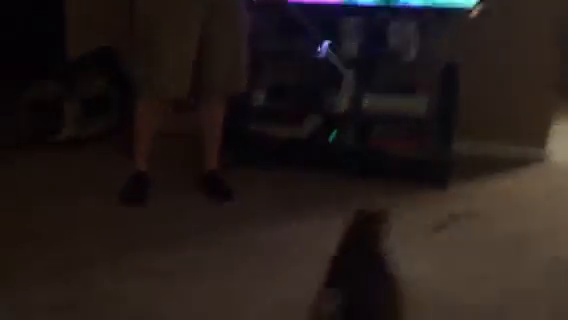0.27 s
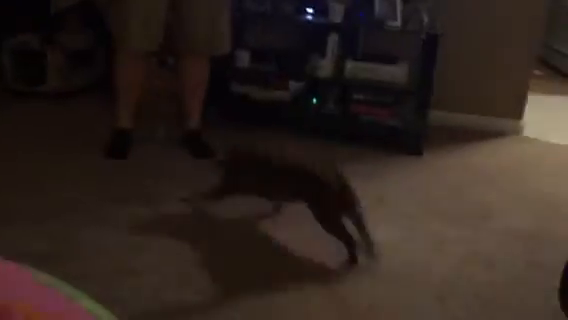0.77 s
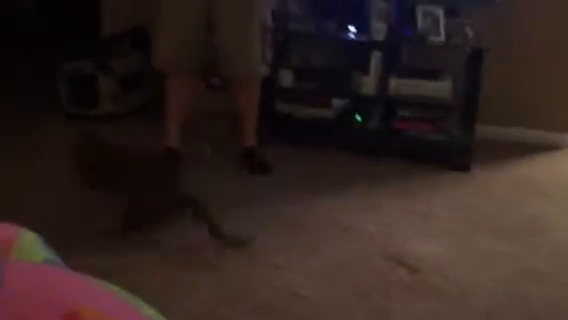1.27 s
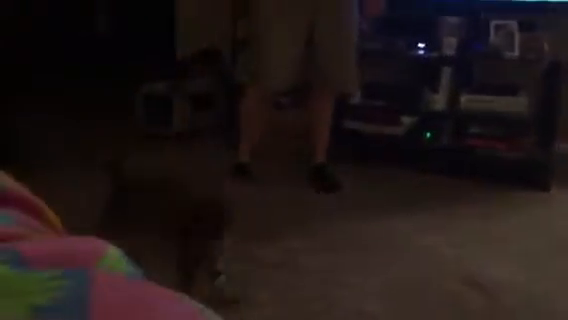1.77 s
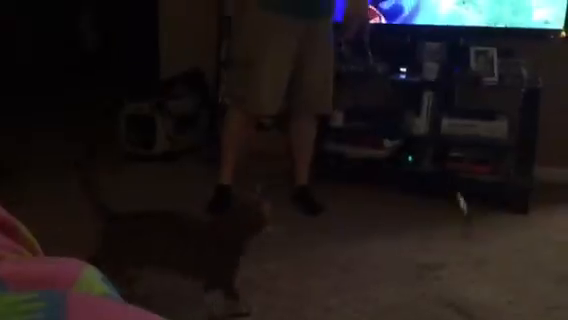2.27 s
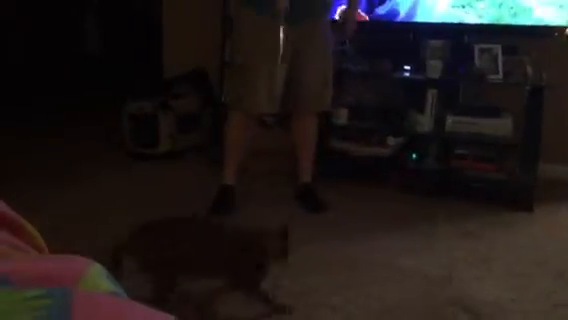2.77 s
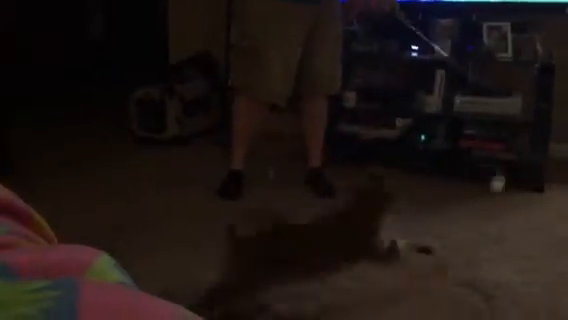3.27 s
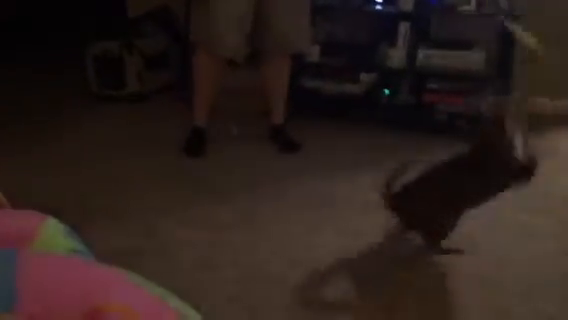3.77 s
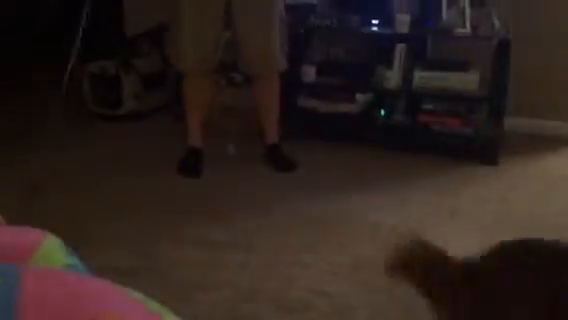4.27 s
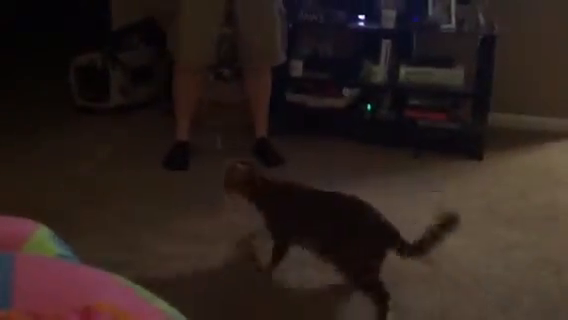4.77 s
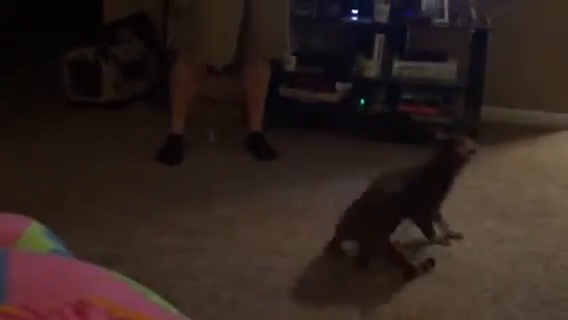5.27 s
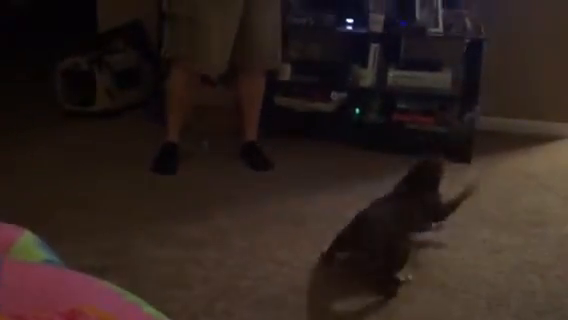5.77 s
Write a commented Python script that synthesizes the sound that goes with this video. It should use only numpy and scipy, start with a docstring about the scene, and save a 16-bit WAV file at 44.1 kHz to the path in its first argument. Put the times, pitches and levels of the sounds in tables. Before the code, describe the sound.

Close, hollow crackling, then soft irregular paw thumps, claw scuffs and the slaps of a feather toy on carpet in a quiet room.

```python
"""Cat chasing a feather toy.

Paws thud into a carpeted wooden floor in a quiet living room and leave the boards rumbling.
The toy slaps down and rustles, claws scuff the pile. At first something stiff and hollow crackles
close by. Faint thin creaks and a squeak follow; later the wand's string whistles twice.
Low hum and microphone hiss lie under it all."""
import sys
import numpy as np
from scipy import signal
from scipy.fft import rfft, irfft, next_fast_len
from scipy.io import wavfile
from scipy.ndimage import map_coordinates

SR = 44100
rng = np.random.default_rng(int(sys.argv[2]) if len(sys.argv) > 2 else 0)


def materialize(psi):
    """Save the field psi as 16-bit PCM at rate SR to the path in sys.argv[1].

    A 1-D psi becomes a single channel; in a 2-D psi each row is a channel.
    """
    bounded = np.clip(np.atleast_2d(psi).T, -1, 1)
    quanta = np.round(bounded * 32767).astype(np.int16)
    wavfile.write(sys.argv[1], SR, quanta)


N = 265482

# paw landings (time [s], level [dB], hardness as mode tilt [dB/octave], joist sag on lowest mode [dB])
LANDINGS = [(0.274, -59, 2, -15), (0.449, -61, -4, -14), (0.779, -59, 6.5, -26), (0.889, -55, 4.5, -23),
            (0.989, -51.5, -2, -15), (1.121, -46, 2.5, -24), (1.307, -40.5, 1.5, -22),
            (1.439, -71, 0.5, -0.5), (1.864, -43, 3.5, -11), (2.359, -54.5, 0, -24), (2.904, -62, 2, -15),
            (2.989, -57, 2, -10), (3.037, -50, -2.5, -17.5), (3.139, -55, -3, -15),
            (3.469, -48.5, -2.5, -14.5), (3.705, -50.5, -0.5, -10.5), (3.774, -45.5, 4.9, -19),
            (3.799, -45.5, 0.5, -19), (4.163, -54, -1, -25), (4.231, -49.5, 6, -14), (4.579, -58, 2.5, -10),
            (4.639, -52.5, 0.5, -28), (4.911, -50.5, -4, -25.5), (5.292, -57.5, -1.3, -9.5),
            (5.339, -62, 0, -5.5), (5.735, -61.5, 4, -8)]
# floorboard modes (frequency [Hz], level [dB])
BOARD_MODES = [(40, 15.5), (76, 4), (120, 3), (163, -3.5), (205, -8), (255, -11), (320, -15), (400, -27),
               (560, -30.5)]
# toy hits the floor (time [s], level [dB], crispness [dB], low-pass [Hz])
TOY_SLAPS = [(0.658, -38, 1.5, 3200), (2.3205, -33, -7, 2185), (3.774, -47, -13.5, 1250),
             (4.459, -38, -12.5, 1350), (5.59, -45.5, -10.5, 1810), (5.6, -32.5, -11, 2120),
             (5.67, -37, -30, 985), (5.72, -46, -30, 700)]
# toy's knock (frequency [Hz], density [dB])
KNOCK_SPECTRUM = [(60, -11.5), (120, 2.5), (330, 2), (480, -3), (850, -7.5), (1100, -4.5), (2200, -15.5),
                  (5000, -15.5)]
# slap echoes off near surfaces (delay [s], gain [dB])
SLAP_ECHOES = [(.007, -5), (.012, -5)]
# feather rustles (time [s], level [dB])
FEATHER_RUSTLES = [(.661, -43.5), (.748, -53), (1.089, -63), (1.225, -57.5), (2.322, -49), (2.484, -53.5),
                   (2.603, -55.5), (3.471, -64), (3.519, -46), (3.528, -39), (3.553, -57.5), (3.715, -66.5),
                   (4.18, -64), (5.591, -52.5), (5.767, -60.5)]
# quill ticks (time [s], peak [dB], high-pass [Hz])
QUILL_TICKS = [(0.6572, -21, 600), (1.2505, -46, 3000), (2.322, -40.5, 3000), (2.4833, -32, 1500),
               (2.6189, -42, 4500), (3.4805, -53, 4000), (3.5295, -29.5, 4000), (3.5544, -47, 4000),
               (5.592, -46, 1500), (5.5992, -38.5, 1500), (5.6154, -40, 1500)]
# feather colour (frequency [Hz], density [dB])
FEATHER_SPECTRUM = [(2060, -22.5), (3500, -25), (3990, -26.5), (6770, -12), (8060, -19), (9130, -16),
                    (14000, -16), (15500, -23.5)]
# claw drags (time [s], level [dB], main band [Hz], length [ms], wide band re main [dB], wide band [Hz])
CLAW_SCUFFS = [(1.047, -58, 2630, 9.1, -6, 3500), (1.119, -61, 1980, 17, -8, 3500),
               (1.301, -59.5, 1600, 20, -10, 3500), (1.448, -59.5, 2750, 16, 2.5, 5900),
               (1.549, -63, 2900, 20, -0.5, 5500), (1.88, -57, 1300, 45, 3, 3300),
               (2.484, -51, 1650, 20, 0, 2700), (3.524, -56, 1300, 12, -2.5, 2860),
               (3.66, -62, 1250, 57, -8, 1900), (3.712, -55, 2350, 20, -4, 1500),
               (3.826, -56, 2700, 28, -1, 4700), (4.766, -58.5, 1390, 18, -13, 3000),
               (4.979, -60, 1466, 14.5, -15, 3200), (5.786, -64, 1440, 19, -6, 3600)]
# hollow shell snaps (time [s], ring peak [dB], edge re ring [dB])
SHELL_SNAPS = [(0.0125, -26, -27), (0.0354, -40, -1.5), (0.051, -27, -25), (0.059, -28, -30),
               (0.0754, -25.5, -20), (0.0869, -25, -12), (0.0964, -29.5, -3), (0.1124, -29, -8.5),
               (0.1236, -17.5, -10.5), (0.1388, -18.5, -12), (0.1454, -19.5, -12.5), (0.168, -27, -4.5),
               (0.183, -31, -25), (0.2057, -28.5, -27), (0.2284, -28.5, -24), (0.2424, -32.5, -18),
               (0.252, -36, -12), (0.2887, -43.5, -10.5), (0.3087, -38, -18), (0.331, -39, -20),
               (0.3404, -29, -19), (0.414, -39.5, -31.5), (0.4625, -37, -33.5), (0.4994, -38, -13),
               (0.5483, -42, -13), (0.7397, -47, -19), (0.8355, -45.5, -28), (0.8749, -40, -14),
               (0.8946, -40, 0.5), (0.946, -47, -10), (0.9847, -33, -10), (1.0625, -43.5, -15)]
# shell patter under strain (time [s], level [dB])
SHELL_STRAIN = [(0, -38), (.04, -47.5), (.1, -41.5), (.16, -41.5), (.24, -47), (.28, -52.5), (.4, -59.5),
                (.6, -59), (.7, -55), (.9, -60.5), (1.25, -78)]
# shell resonances (frequency [Hz], width [Hz], level [dB])
SHELL_MODES = [(385, 150, -9), (659, 70, -1), (1046, 400, -8), (1459, 180, 5), (2080, 338, -2),
               (2317, 300, -1)]
# shell's crisp edge (frequency [Hz], density [dB])
EDGE_SPECTRUM = [(2000, -29), (3000, -4.5), (4300, -2.5), (5200, -8.5), (6300, -2), (7400, -14),
                 (10500, -15), (15000, -19)]
# faint thin tones (time [s], length [s], top pitch [Hz], level [dB], pitch lost by the end [fraction])
FAINT_SQUEAKS = [(1.12, .05, 1900, -68, .01), (1.43, .045, 2150, -70, .01), (1.8, .06, 6050, -72, .002),
                 (3.03, .08, 1705, -74, .07), (4.795, .165, 1715, -69.5, .07)]
# room decay (frequency [Hz], T60 [s])
ROOM_DECAY = [(100, .35), (500, 0.23), (2000, .22), (10000, 0.2)]
# hum envelope (time [s], level [dB])
HUM_LEVELS = [(0, -56), (1, -52), (2.5, -54.5), (2.75, -61.5), (3.1, -57), (5, -57), (6.02, -63)]
# room air and hiss (frequency [Hz], density [dB])
AIR_SPECTRUM = [(20, -31.5), (45, -4), (80, -10.5), (130, -13), (210, -16), (450, -25.5), (800, -29.5),
                (1500, -30.5), (4500, -36.5), (9000, -40), (10400, -44), (12500, -40), (15500, -47.5)]

CONTACT_S, LINGER_S_PER_DB, HARD_LANDING_DB = .054, .0004, -39.5  # softer steps rest longer
RUMBLE_DB, RUMBLE_T60_S = -11, .56
THUMP_T60_S, KNOCK_T60_S = .11, .088
BLOW_CYCLE_MS, BLOW_DB = .7, 12  # cycle at a 3 kHz low-pass; gain re the crisp part
WHIP_MS, SWISH_MS_PER_DB, WHIP_DB = 10, .93, -42  # gentler swishes last longer
TONE_PEAK_FRACTION, TONE_FALL_DB = .3, 9
HUM_HZ, HISS_DB, BAND_LIMIT_HZ = 75.3, -73.4, 15640  # hiss: rms above 500 Hz


def amp(db):
    """dB to gain."""
    return 10 ** (np.asarray(db) / 20)


def unit(x):
    """Scale to rms 1."""
    return x / np.sqrt(np.mean(x ** 2) + 1e-20)


def unit_peak(x):
    """Scale to peak 1."""
    return x / np.max(np.abs(x))


def along(points, hz):
    """Interpolate (Hz, value) points on a log axis."""
    f, v = np.transpose(points)
    return np.interp(np.log(hz + 1), np.log(f + 1), v)


def spectrum(points):
    """Response through (Hz, dB) points."""
    return lambda f: amp(along(points, f))


def curve(rows):
    """Interpolate (s, value) rows per sample."""
    return np.interp(np.arange(N) / SR, *np.transpose(rows))


def wobble(rate_hz):
    """Smooth random curve, knots at rate_hz."""
    knots = rng.standard_normal(int(N * rate_hz / SR) + 4)
    return map_coordinates(knots, [np.arange(N) * rate_hz / SR])


def filtered(x, response):
    """Apply a complex frequency response."""
    size = next_fast_len(len(x) + 8192)
    return irfft(rfft(x, size) * response(np.fft.rfftfreq(size, 1 / SR)), size)[:len(x)]


def noise(response, size=N):
    """Coloured noise, rms 1."""
    return unit(filtered(rng.standard_normal(size), response))


def grains(spread_db, clump_db, size=SR // 5):
    """Noise whose level jumps per sample and per 100-sample clump."""
    clumps = np.repeat(rng.standard_normal(size // 100 + 1), 100)[:size]
    return rng.standard_normal(size) * amp(spread_db * rng.standard_normal(size) + clump_db * clumps)


def lumpy(width_hz, depth_db):
    """Response with random narrow peaks and dips."""
    knots = rng.standard_normal(400)
    return lambda f: amp(depth_db * np.interp(f / width_hz, np.arange(len(knots)), knots))


def add(track, start_s, sound):
    """Mix a sound into a track."""
    part = track[max(round(start_s * SR), 0):][:len(sound)]
    part += sound[:len(part)]


def burst(rise_s, t60_s, size=SR // 3):
    """Envelope: rise, exponential fall."""
    t = np.arange(size) / SR
    return (1 - np.exp(-t / rise_s)) * amp(-60 * t / t60_s)


def swell(length_ms, size=SR // 5):
    """Envelope: quick rise, soft end."""
    age = np.arange(size) * 1000 / SR / length_ms
    return (1 - np.exp(-(age / .27) ** 2)) * np.exp(-age ** 1.1)


def paws():
    """Padded paws press softly: each board mode swells, wavers under the weight, then dies."""
    out, t = np.zeros(N), np.arange(SR // 3) / SR
    for start_s, db, tilt_db, sag_db in LANDINGS:
        thud = np.zeros(len(t))
        contact_s = CONTACT_S + LINGER_S_PER_DB * (HARD_LANDING_DB - db)
        for k, (hz, mode_db) in enumerate(BOARD_MODES):
            fade_s = contact_s * (100 / hz) ** .4
            shape = (1 - np.exp(-(t * hz / 1.23) ** 2)) * np.exp(-(t / fade_s) ** 3.2)
            waver = 1 + .55 * np.sin(2 * np.pi * (rng.uniform(20.3, 41) * t + rng.random()))
            tone = np.sin(2 * np.pi * (hz * rng.normal(1, .035) * t + rng.random()))
            strength_db = mode_db + (tilt_db * np.log2(hz / 120) if k else sag_db)
            thud += amp(strength_db) * unit_peak(shape) * waver * tone
        add(out, start_s - .005, amp(db) * thud)
    return out


def board_rumble():
    """Small shifts of weight keep the boards rolling after each landing."""
    weight, boards = np.zeros(N), spectrum(BOARD_MODES[1:])
    for start_s, db, *_ in LANDINGS:
        add(weight, start_s, amp(db + RUMBLE_DB) * burst(.025, RUMBLE_T60_S, size=SR // 2))
    return weight * amp(4 * wobble(25)) * noise(lambda f: boards(f) * (f > 60) * (f < 700))


def toy_slaps():
    """Sharp first contact with echoes, then a hollow knock whose upper part dies first."""
    out, body = np.zeros(N), spectrum(KNOCK_SPECTRUM)
    t_ms = np.arange(SR // 100) * 1000 / SR
    for start_s, db, crisp_db, top_hz in TOY_SLAPS:
        low = noise(lambda f: body(f) / (1 + (f / 700) ** 4), SR // 3)
        high = noise(lambda f: body(f) / (1 + (700 / (f + 1)) ** 4) / (1 + (f / top_hz) ** 8), SR // 3)
        thump = low * burst(.0021, THUMP_T60_S)
        knock = amp(crisp_db) * high * burst(.003, KNOCK_T60_S)
        add(out, start_s, amp(db) * (thump + knock))
        cycles = t_ms / BLOW_CYCLE_MS * top_hz / 3000  # duller slaps land slower
        blow = np.sin(2 * np.pi * cycles) * np.sin(np.pi * np.clip(cycles / 1.5, 0, 1))
        for delay_s, echo_db in [(0, 0)] + SLAP_ECHOES:
            add(out, start_s + delay_s, amp(db + crisp_db + BLOW_DB + echo_db) * blow)
    return out


def feathers():
    """Barbs rustle in grains; now and then a quill ticks."""
    out, colour = np.zeros(N), spectrum(FEATHER_SPECTRUM)
    for start_s, db in FEATHER_RUSTLES:
        length_ms = WHIP_MS + SWISH_MS_PER_DB * (WHIP_DB - db)
        barbs = unit(filtered(grains(spread_db=4, clump_db=3), colour))
        add(out, start_s, amp(db) * barbs * swell(length_ms))
    for start_s, db, cut_hz in QUILL_TICKS:
        band = lambda f: np.sqrt(colour(f)) / (1 + (cut_hz / (f + 1)) ** 2) / (1 + f / 9000)
        tick = noise(band, SR // 50) * burst(.0001, .002, size=SR // 50)
        add(out, start_s, amp(db) * unit_peak(tick))
    return out


def claw_scuffs():
    """Carpet fibres let go one by one under dragging claws: an uneven brush in two bands."""
    out = np.zeros(N)
    hump = lambda f, hz, width: np.exp(-(np.log((f + 1) / hz) / width) ** 2)
    for start_s, db, main_hz, length_ms, wide_db, wide_hz in CLAW_SCUFFS:
        fibres = grains(spread_db=5, clump_db=3.5)
        ripple = lumpy(width_hz=130, depth_db=5)
        main = unit(filtered(fibres, lambda f: hump(f, main_hz, .17) * ripple(f)))
        wide = unit(filtered(fibres, lambda f: hump(f, wide_hz, .3) * ripple(f)))
        age = np.arange(len(fibres)) * 1000 / SR / length_ms
        add(out, start_s, amp(db) * (main + amp(wide_db) * wide) * age * np.exp(-age ** 1.7))
    return out


def shell_ring(x, modes):
    """Resonances of a hollow shell; its soft walls pass little above 4 kHz."""
    def response(f):
        peaks = sum((-1) ** k * amp(db) * 1j * f * width_hz / (hz * hz - f * f + 1j * f * width_hz)
                    for k, (hz, width_hz, db) in enumerate(modes))
        return peaks / (1 + 1j * f / 4000) ** 2
    return filtered(x, response)


def shell_crackle():
    """Brief snaps and a gritty patter of small slips ring the shell."""
    out, crisp, size = np.zeros(N), spectrum(EDGE_SPECTRUM), SR // 20
    for start_s, db, edge_db in SHELL_SNAPS:
        slip = rng.standard_normal((2, size)) * amp(4.1 * rng.standard_normal(size))
        slip *= swell(length_ms=5.56, size=size)
        modes = [(hz * rng.normal(1, .04), width_hz, mode_db + rng.normal(0, 3))
                 for hz, width_hz, mode_db in SHELL_MODES]
        ripple = lumpy(width_hz=350, depth_db=6)
        ring = unit_peak(shell_ring(slip[0], modes))
        edge = unit_peak(filtered(slip[1], lambda f: crisp(f) * ripple(f)))
        add(out, start_s - .002, amp(db) * (ring + amp(edge_db) * edge))
    grit = amp(4 * wobble(200) + 4.5 * wobble(45)) * rng.standard_normal((2, N))
    patter = unit(shell_ring(grit[0], SHELL_MODES))
    patter += amp(-18) * unit(filtered(grit[1] * amp(5 * wobble(30)), crisp))
    strained = np.arange(N) / SR < SHELL_STRAIN[-1][0]
    return out + strained * amp(curve(SHELL_STRAIN)) * patter


def thin_tones():
    """Faint thin squeaks and creaks; the last two are the wand string's falling whistle."""
    out, t = np.zeros(N), np.arange(N) / SR
    for start_s, length_s, top_hz, db, drop in FAINT_SQUEAKS:
        progress = np.clip((t - start_s) / length_s, 0, 1)
        fall = ((progress - TONE_PEAK_FRACTION) / (1 - TONE_PEAK_FRACTION)) ** 2
        fade = np.clip(np.minimum(progress, 1 - progress) * length_s / .01, 0, 1)
        level_db = db - TONE_FALL_DB * fall + 4 * wobble(50)
        pitch_hz = top_hz * (1 - drop * fall) + 22 * wobble(300)
        out += fade * amp(level_db) * np.sin(2 * np.pi * np.cumsum(pitch_hz) / SR)
    return out


def room(x):
    """Furnished room: lows ring longest; a new random tail every third of a second."""
    hop = SR // 3
    out = np.zeros(N + hop)
    x = np.pad(x, (hop, 0))
    for start in range(0, N + hop, hop):
        hz, t, bins = signal.stft(rng.standard_normal(SR // 2), SR, nperseg=512)
        decay = amp(-60 * t / along(ROOM_DECAY, hz)[:, None])
        tail = signal.istft(bins * decay, SR, nperseg=512)[1]
        part = x[start:start + 2 * hop]
        window = np.sin(np.pi * np.arange(len(part)) / (2 * hop))
        add(out, start / SR + .006, signal.fftconvolve(part * window, tail / np.linalg.norm(tail)))
    return out[hop:]


def hum():
    """Low tone, slightly unsteady in level and pitch."""
    level_db = curve(HUM_LEVELS) + 2.6 * wobble(8)
    pitch_hz = HUM_HZ + 1.3 * wobble(13)
    return amp(level_db) * np.sin(2 * np.pi * np.cumsum(pitch_hz) / SR)


def hiss():
    """Room air and microphone hiss, drifting slightly in level."""
    air = noise(spectrum(AIR_SPECTRUM))
    air /= np.std(filtered(air, lambda f: f > 500))
    drift_db = .6 * wobble(5) + .5 * wobble(1)
    return amp(HISS_DB + drift_db) * air


def scene():
    """Play out in the room, crackle close by, background around."""
    play = paws() + board_rumble() + toy_slaps() + feathers() + claw_scuffs() + thin_tones()
    near = shell_crackle()
    reverb = room(amp(-7.5) * play + amp(-9.5) * near)
    return (play + near + reverb + hum() + hiss())[None]


def record(dry):
    """Brick-wall low-pass."""
    return filtered(dry[0], lambda hz: hz < BAND_LIMIT_HZ)[None]


dry = scene()
out = record(dry)
materialize(out)
```